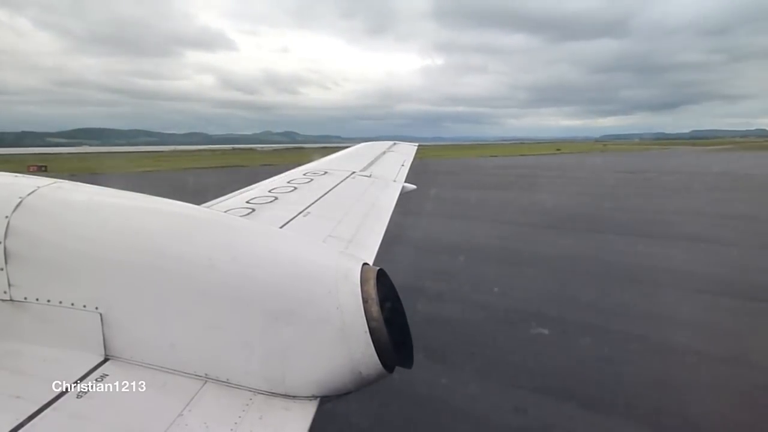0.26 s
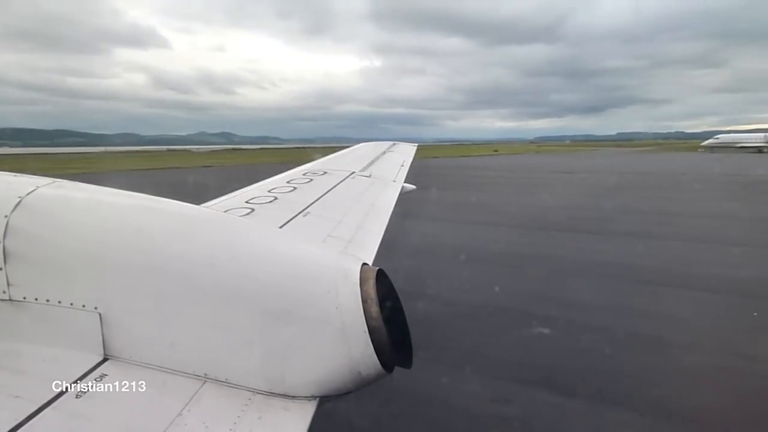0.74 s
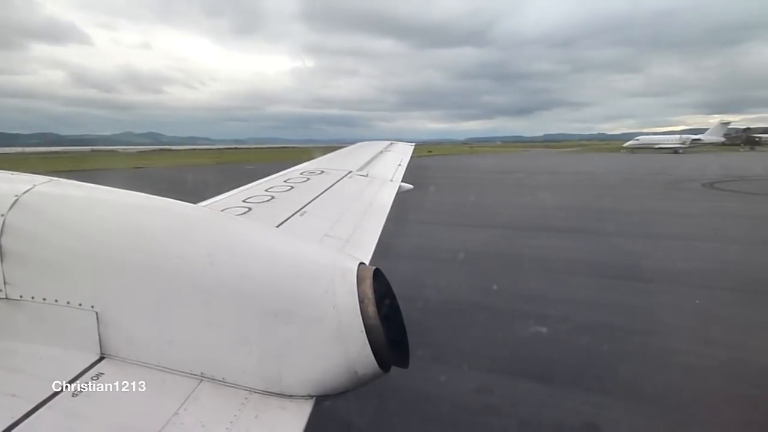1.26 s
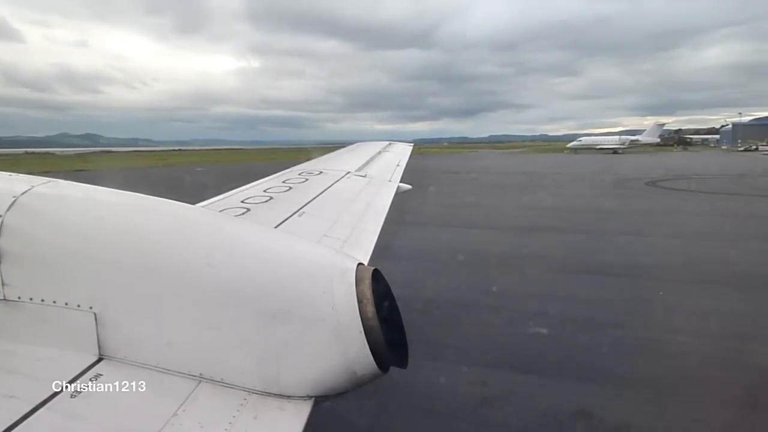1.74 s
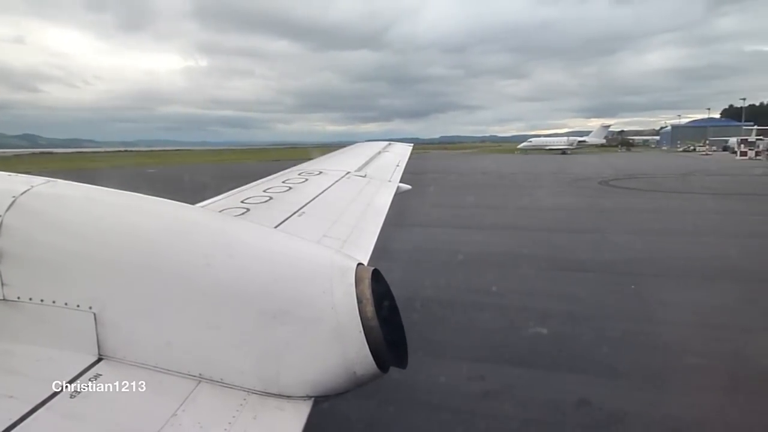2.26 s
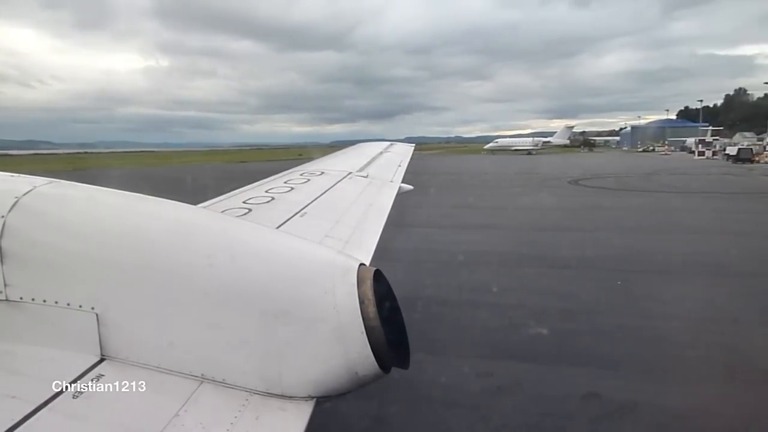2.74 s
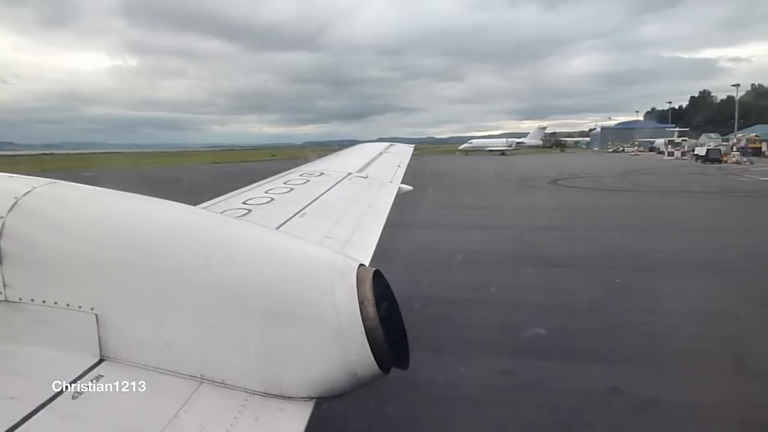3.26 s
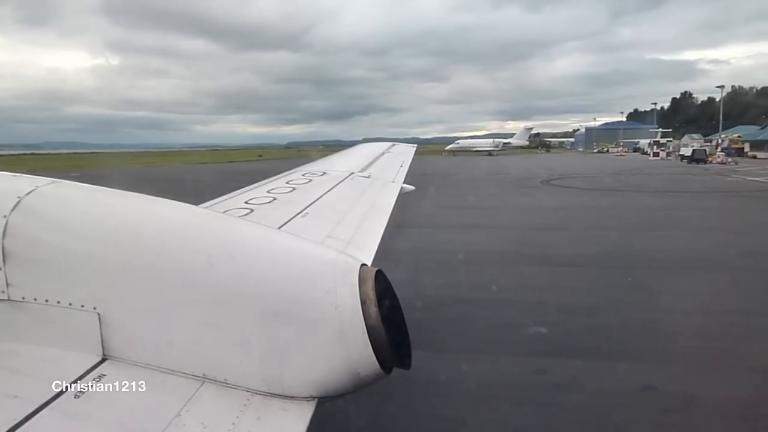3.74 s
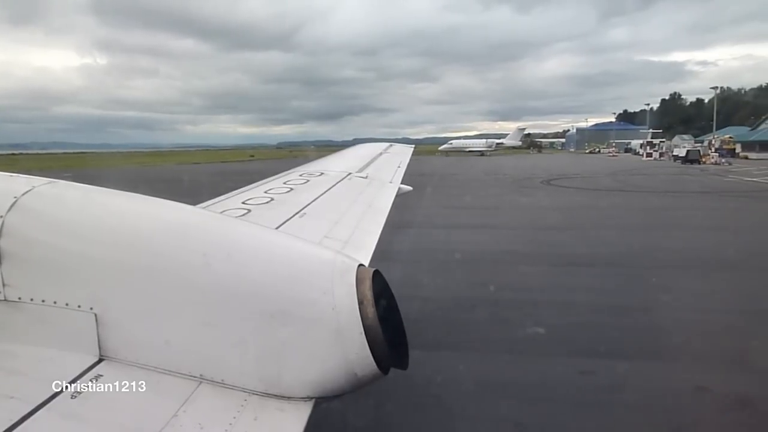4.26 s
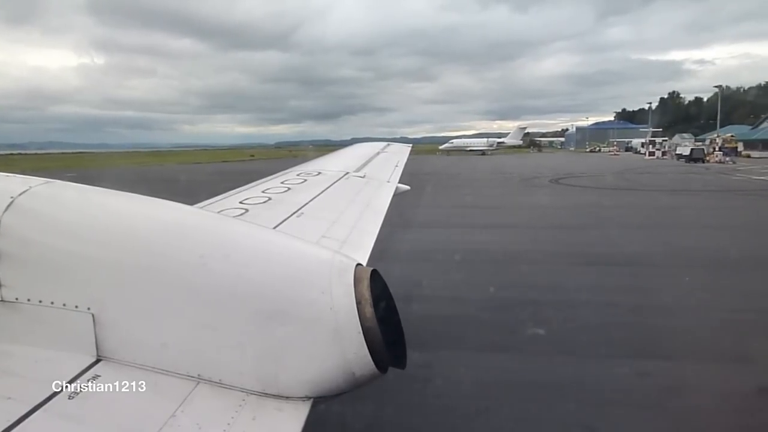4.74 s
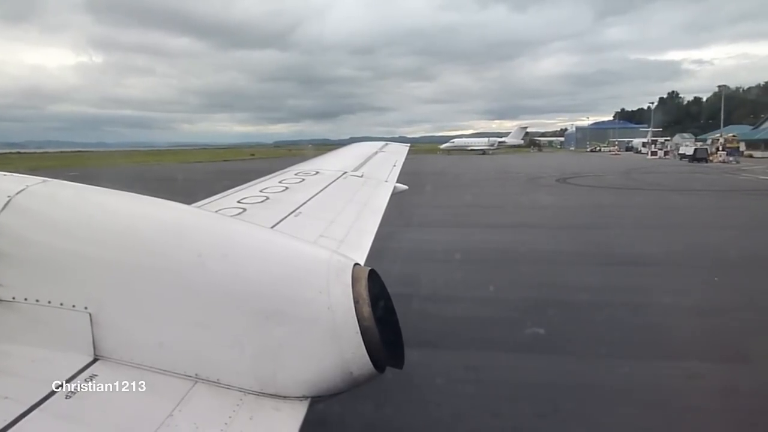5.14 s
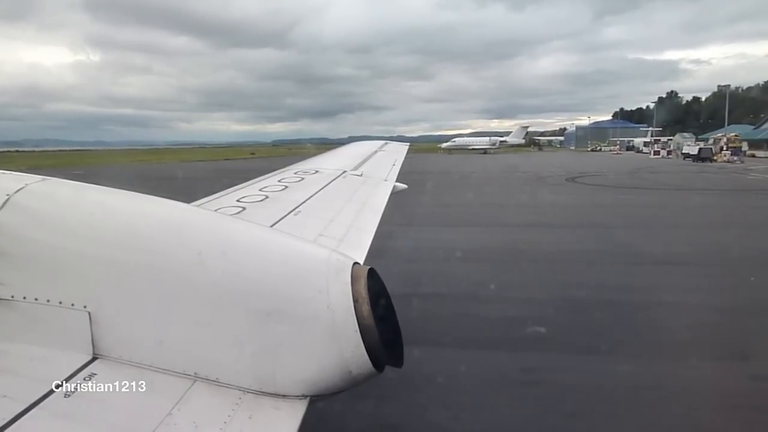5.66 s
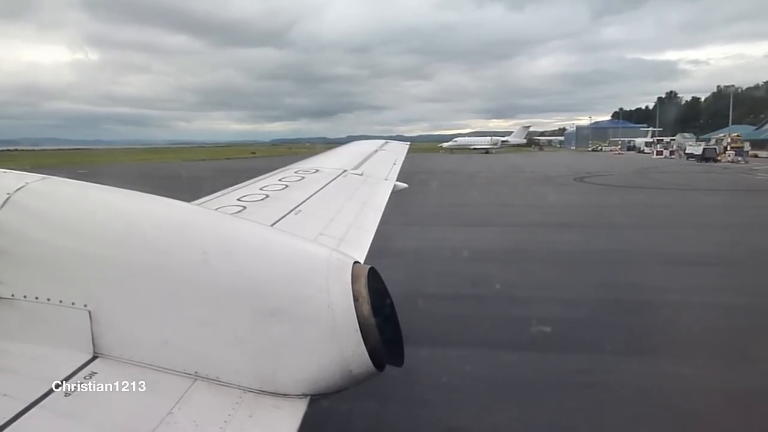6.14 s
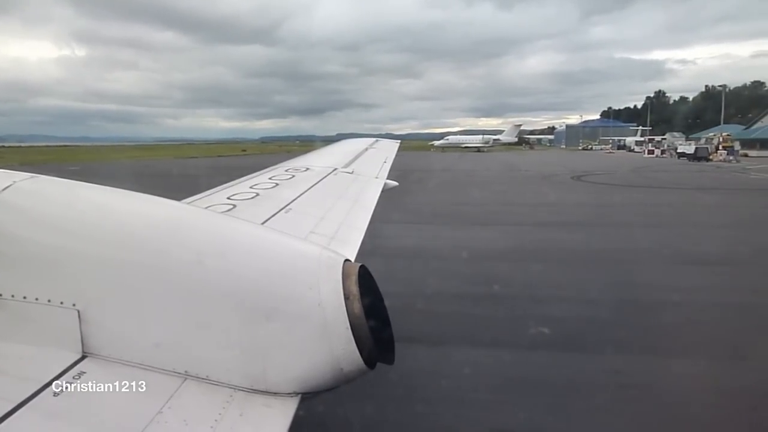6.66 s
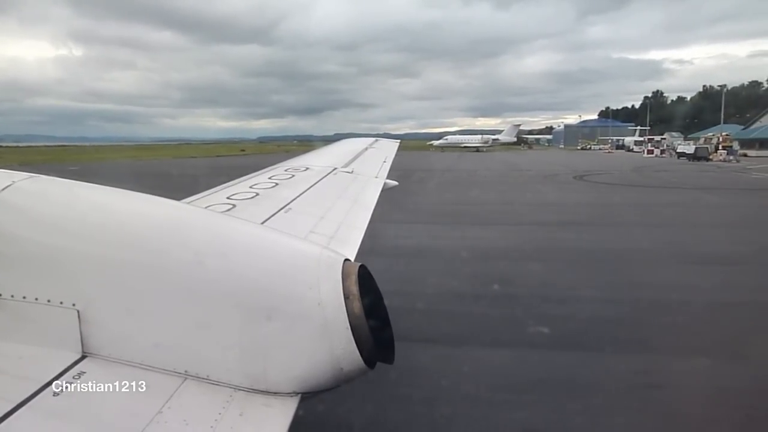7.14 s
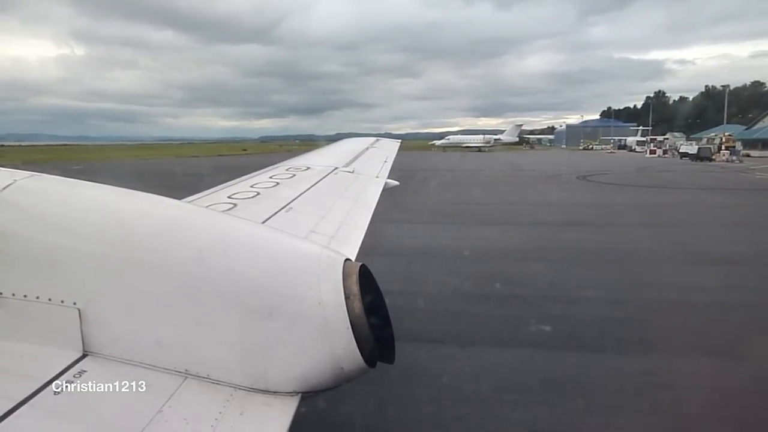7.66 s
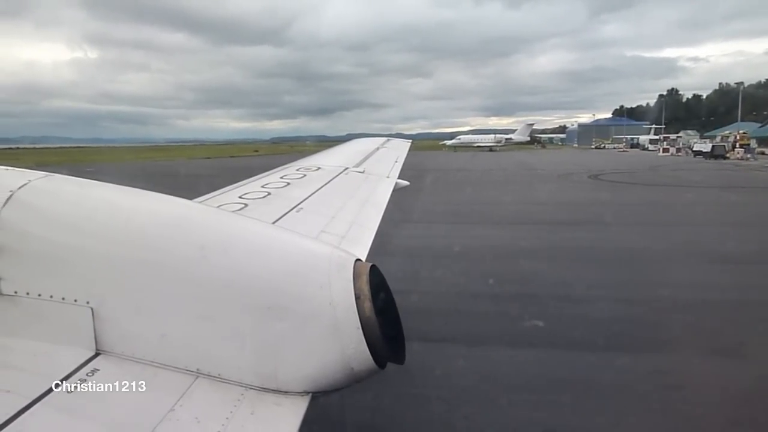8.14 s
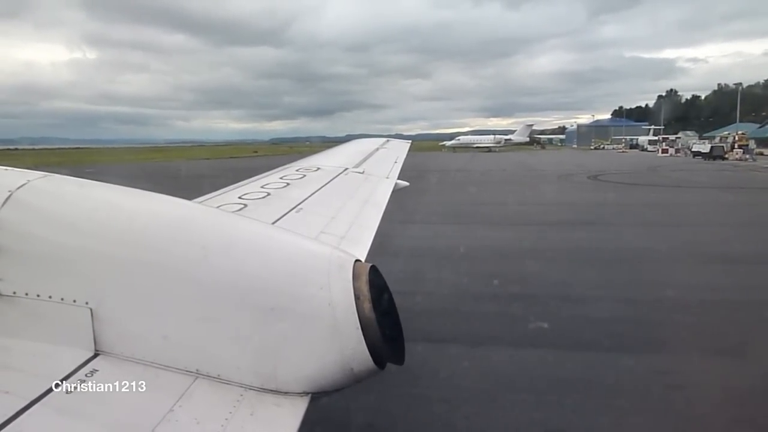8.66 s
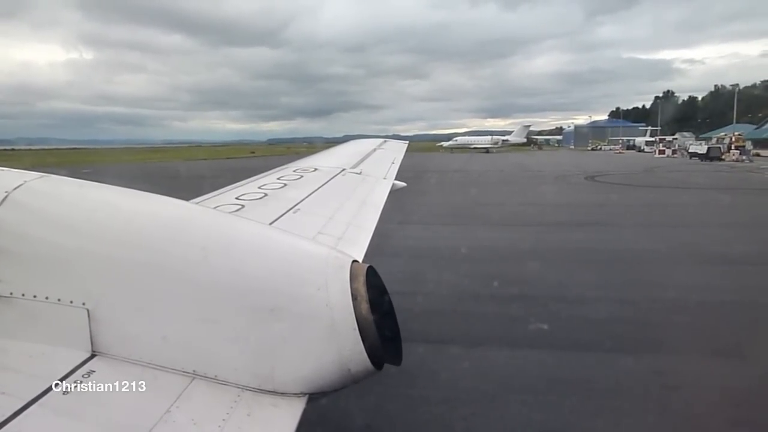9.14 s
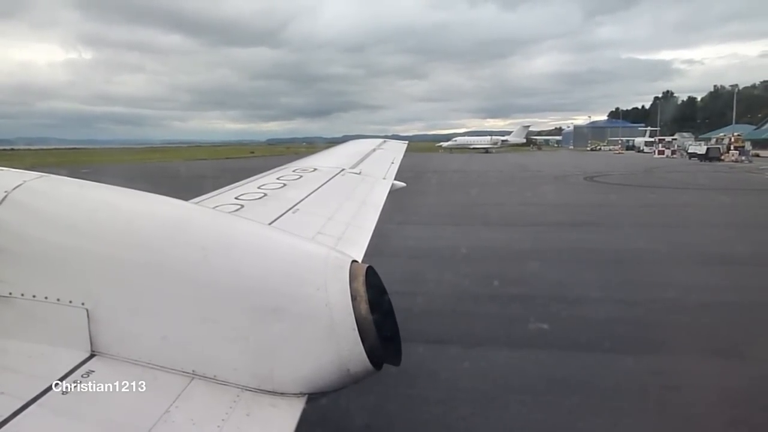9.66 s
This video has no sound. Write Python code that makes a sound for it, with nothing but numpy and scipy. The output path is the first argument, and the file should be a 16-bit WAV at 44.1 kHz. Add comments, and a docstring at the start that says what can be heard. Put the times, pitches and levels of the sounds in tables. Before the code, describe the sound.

A twin turboprop aircraft taxis at idle, heard from a window seat inside the cabin. The propellers make an even, low drone with a muffled exhaust roar, and a constant high whine stands out above it. Air vents hiss softly while the wheels rumble faintly on asphalt. Near the end, the cabin trim gives a couple of tiny ticks as the engines carry on unchanged.

```python
"""Turboprop cabin while taxiing

A twin turboprop taxis at ground idle, heard from two close microphone ports at a cabin window.
The four-blade propellers chop turbulent air into noisy humps near multiples of the blade rate.
Blade tones, shaft tones and a gear whine stand out of the exhaust roar and the hiss of the air vents.
The wheels rumble on asphalt, the vents whistle faintly, and late on the trim gives a few small ticks."""
import sys
import numpy as np
from scipy import signal
from scipy.fft import rfft, irfft, next_fast_len
from scipy.io import wavfile

SR = 44100
rng = np.random.default_rng(int(sys.argv[2]) if len(sys.argv) > 2 else 0)


def materialize(psi):
    """Save the field psi as 16-bit PCM at rate SR to the path in sys.argv[1].

    A 1-D psi becomes a single channel; in a 2-D psi each row is a channel.
    """
    bounded = np.clip(np.atleast_2d(psi).T, -1, 1)
    quanta = np.round(bounded * 32767).astype(np.int16)
    wavfile.write(sys.argv[1], SR, quanta)


N = 437031
FFT_SIZE = next_fast_len(N)
HZ = np.maximum(np.arange(FFT_SIZE // 2 + 1) * SR / FFT_SIZE, 1)

# Coherence of the ports. Each row: frequency in Hz, share of the power common to both.
COHERENCE = [(25, .98), (60, 1), (300, 0.99), (700, 0.92), (1300, 0.89), (2100, 0.66), (3500, 0.21),
             (5000, 0.82), (7000, 0.24), (10000, 0.12), (12000, 0.52), (14000, 0.17)]
# Balance of the ports. Each row: frequency in Hz, left minus right in dB.
BALANCE = [(60, 1.5), (150, 0.5), (380, 0.5), (950, 1.5), (2380, 1.5), (5980, 0), (15000, 0.5)]
# Propeller drone. Each row: time in seconds, level in dB.
DRONE_LEVEL = [(0, -21), (1.3, -19), (1.9, -20), (2.8, -19.5), (3.6, -20.5), (5.1, -19.5), (5.9, -21),
               (6.5, -21.5), (7.4, -21.5), (8.0, -22), (8.6, -21.5), (9.9, -22.5)]
# Turbulence cut by the blades. Each row: centre in Hz, width in Hz, relative level in dB.
BLADE_HUMPS = [(63.5, 20, -23), (134.5, 17.6, -1), (204.6, 27, 1.5), (268, 28, 0.5), (335, 25.5, 0.5),
               (400.6, 31, -3), (457.5, 53, -6.5)]
# Slow swells. Each row: time in seconds, gain in dB of humps 2, 3, 4, 5 and of the upper two together.
HUMP_GAINS = [(0, 4, -0.9, -0.24, 0.23, 0), (.7, 0, 0.71, 0.93, 0.38, 2.5), (1.4, -7, 1.8, 2, 1, -1),
              (2.0, 0.5, 0, -1.5, -0.19, -2), (2.6, 0.5, -0.67, 0.21, -0.24, 1),
              (3.3, 2.5, 0.083, 1.5, 1, -1.5), (4.0, -1, -0.053, 1.8, -0.11, 2.5),
              (4.7, 0.5, -0.21, 2, 0.5, 0), (5.2, -0.5, 1, 0, 0.16, 1), (5.7, 2.5, -2, 0.13, -0.36, -2),
              (6.4, 1, -1.3, -0.72, -1.3, 0), (7.2, -0.5, 1.3, 0, 1, 1), (7.9, 0.5, 1, 0, -0.021, -2.5),
              (8.5, -1.5, 1.5, 0, -0.1, 2.5), (9.15, 1, 0, 0, 1, 1), (9.9, 3.5, -0.25, 0, 0, -1.5)]
# Noise spectra. Each row: frequency in Hz, relative spectral density in dB.
RUMBLE_SPECTRUM = [(30, -50), (50, -26), (64, -6), (100, -5), (170, -1.5), (250, -1), (295, -2), (330, 2.5),
                   (366, -10), (400, -1.5), (450, -0.5), (525, -5.5), (550, -3), (620, -4), (700, -8.5),
                   (735, -6), (900, -13.5), (1300, -44.5)]    # between the humps
ROAR_SPECTRUM = [(500, -2), (850, -3), (1040, -5.5), (1500, -6.5), (1930, -16), (2230, -17), (2420, -44),
                 (2600, -60.5), (3380, -47), (5720, -120)]    # exhaust through the wall
HISS_SPECTRUM = [(1410, -7), (2400, -1), (3470, -3), (3830, -1), (4470, -4), (5660, -2), (6550, -6),
                 (9470, -11), (10800, -6), (15000, -4)]    # vents and intake
HISS_EDGE = [(15300, -12), (15750, -15)]    # top of the hiss
WHEEL_SPECTRUM = [(10, -16), (25, -9), (45, 3), (60, -1), (90, -39)]    # tyres on asphalt
# Engine noise, given as that of its hiss. Each row: time in seconds, level in dB.
ENGINE_LEVEL = [(0, -46), (.4, -45.8), (1.13, -47.5), (1.8, -47.5), (2.85, -47), (3.65, -48), (4.25, -44.5),
                (4.9, -45.5), (5.44, -46.5), (5.65, -49), (5.79, -46), (5.93, -49), (6.1, -48), (6.8, -48),
                (7.1, -46), (7.4, -49), (8.4, -48.5), (9.07, -47), (9.5, -49), (9.9, -47.5)]
# Rolling noise. Each row: time in seconds, level in dB.
WHEEL_LEVEL = [(0, -56), (1.2, -55), (2.7, -55), (3.6, -54), (4.8, -58), (6.0, -51), (7.5, -53), (8.3, -50),
               (9.9, -49)]
# Gear whine. Each row: time in seconds, pitch in Hz, level in dB.
GEAR_TONE = [(0.0, 766.5, -34.6), (1.2, 767.2, -35.6), (1.8, 764.5, -35.4), (2.4, 762.4, -35.2),
             (3.0, 760.7, -38.6), (3.6, 760.4, -39), (4.0, 761.1, -34), (4.8, 762.7, -34),
             (5.4, 762.3, -33.5), (5.8, 762.0, -37), (6.9, 759.5, -36.6), (7.6, 758.7, -38.2),
             (8.3, 759.0, -37.2), (9.9, 758.4, -37.2)]
# Its third harmonic. Each row: time in seconds, level in dB.
GEAR_THIRD = [(0, -62), (1.3, -68), (2.6, -62), (4.9, -58), (6.1, -63), (6.8, -68), (8.2, -62), (9.9, -64)]
# Blade tones, a list for each propeller. Each row: time in seconds, pitch in Hz, level in dB.
BLADE_TONES = [
    [(0, 70.6, -34), (1.2, 70.5, -37), (1.8, 71.4, -32.5), (2.5, 70.2, -38), (3.3, 70.5, -33),
     (4.2, 70.1, -42), (4.8, 70.4, -38), (6.2, 69.9, -32.5), (9.9, 70.26, -39)],
    [(0, 68.5, -42), (2.3, 68.2, -45), (3.2, 66.3, -48), (4.2, 67.4, -46), (6.2, 67.1, -40.5),
     (9.9, 66.4, -36.5)],
]
# Their harmonics. Each row: multiple of the pitch, level in dB against the tone's mean.
BLADE_HARMONICS = [(2, -6), (3, -3.5), (4, -4), (5, -4), (6, -8.5)]
# Faint tones of the shafts and a turbine stage. Each row: centre in Hz, width in Hz, mean level in dB.
SHAFT_BANDS = [(35, 1.5, -64), (83, 2, -46.5), (746, 7.6, -52)]
TURBINE_BANDS = [(10481, 25, -74)]
# Vent whistles. Each row: centre in Hz, width in Hz.
WHISTLE_BANDS = [(3800, 110), (5000, 160), (5800, 200)]
# Their rise and fall. Each row: time in seconds, level in dB of each whistle.
WHISTLE_LEVELS = [(0, -69, -72, -76), (.8, -68, -70, -76), (1.5, -70, -72, -76), (2.5, -72, -72, -74),
                  (3.3, -67, -63, -73), (4.4, -62, -63, -72), (5.2, -66, -74, -74), (6.0, -76, -74, -75),
                  (6.9, -66, -72, -78), (7.999, -63, -72, -78), (9.0, -68, -69, -74), (9.9, -73, -72, -83)]
# Contacts in the trim. Each row: start in seconds, ring peak in dB, ring pitch in Hz,
# time to fall 60 dB in seconds, crack against ring in dB, left minus right in dB.
TRIM_CONTACTS = [(7.5722, -38, 2700, .005, -6, 4), (7.5738, -44, 10300, .006, -5, 1),
                 (7.5762, -39, 5400, .012, -5, 1), (7.5765, -42, 6900, .014, -8, 1),
                 (7.592, -44, 7300, .012, -5, 1), (8.5455, -24.5, 9600, 0.0041, -8, -4),
                 (8.5585, -42, 13500, .006, -4, -4)]


def amp(db):
    """Amplitude ratio of a level in dB."""
    return 10 ** (np.asarray(db) / 20)


def unit_rms(x):
    """The signal scaled to rms 1."""
    return x / np.sqrt(np.mean(np.abs(x) ** 2) + 1e-20)


def in_time(rows):
    """Columns of a table as curves, one value a sample."""
    seconds, *columns = np.transpose(rows)
    return [np.interp(np.arange(N) / SR, seconds, column) for column in columns]


def in_frequency(rows):
    """A table interpolated at every bin on a logarithmic frequency axis."""
    hz, value = np.transpose(rows)
    return np.interp(np.log(HZ), np.log(np.maximum(hz, 1)), value)


def drift(corner_hz):
    """Slow random fluctuation of spread 1: noise through a two-pole low-pass."""
    step, settle = 40, 2000
    pole = np.exp(-2 * np.pi * step * corner_hz / SR)
    white = rng.standard_normal(N // step + settle + 2)
    slow = signal.lfilter([1], [1, -2 * pole, pole * pole], white)[settle:]
    return np.interp(np.arange(N) / step, np.arange(len(slow)), unit_rms(slow - slow.mean()))


def phase_of(hz):
    """Phase is the time integral of frequency."""
    return 2 * np.pi * np.cumsum(hz) / SR


def sine(phase, db):
    """A sinusoid of this rms level."""
    return np.sqrt(2) * amp(db) * np.sin(phase)


def band(hz, width_hz):
    """Magnitude of a flat-topped band whose power does not depend on its width."""
    return 1 / np.sqrt(1 + (2 * (HZ - hz) / width_hz) ** 4) / np.sqrt(width_hz)


def waveform(spectra):
    """Inverse Fourier transform for both ports."""
    return irfft(spectra, FFT_SIZE)[:, :N]


def at_ports(common, own=(0, 0), lag_s=.00003):
    """Time and level differences: the common part arrives later on the right; balance varies with pitch."""
    delay = np.exp(-2j * np.pi * HZ * lag_s)
    lean = amp(in_frequency(BALANCE) / 2)
    return np.array([(common + own[0]) * lean, (common * delay + own[1]) / lean])


def noise_spectra(magnitude):
    """Partial coherence: each port receives a common noise plus one of its own."""
    white = rng.standard_normal((3, len(HZ))) + 1j * rng.standard_normal((3, len(HZ)))
    share = np.clip(in_frequency(COHERENCE), 0, 1)
    return magnitude * at_ports(white[0] * np.sqrt(share), white[1:] * np.sqrt(1 - share))


def noise(magnitude):
    """Partly coherent noise of this spectral shape, rms 1."""
    return unit_rms(waveform(noise_spectra(magnitude)))


def gusty_noise(spectrum, gust, gust_db, flicker_db):
    """Amplitude modulation: half-octave bands follow the gusts together and flicker separately."""
    spectra, out = noise_spectra(amp(in_frequency(spectrum))), 0
    low_hz, high_hz = spectrum[0][0], spectrum[-1][0]
    for centre in np.arange(np.log2(low_hz), np.log2(high_hz) + .5, .5):
        window = np.cos(np.pi * np.clip(np.log2(HZ) - centre, -.5, .5)) ** 2    # neighbours cross-fade
        out += waveform(spectra * window) * amp(gust_db * gust + flicker_db * drift(16))
    return unit_rms(out)


def propeller_drone(gust):
    """Spectral broadening: eddies last a few blade passes, so each harmonic smears into a noise band."""
    surge_db = 0.22 * gust + 0.49 * drift(5.9)
    *lower, upper = in_time(HUMP_GAINS)
    humps = 0
    for (hz, width_hz, db), swell_db in zip(BLADE_HUMPS, [0, *lower, upper, upper]):
        humps += amp(db + swell_db + 0.47 * drift(0.94)) * noise(band(hz, width_hz))
    rumble = amp(-7) * noise(amp(in_frequency(RUMBLE_SPECTRUM)))
    return amp(in_time(DRONE_LEVEL)[0] + surge_db) * (unit_rms(humps) + rumble)


def exhaust_roar(gust, swing_db):
    """Transmission loss: exhaust noise comes through the wall with little treble."""
    return amp(-37.5 + 0.96 * swing_db) * gusty_noise(ROAR_SPECTRUM, gust, gust_db=0.8, flicker_db=0.5)


def vent_hiss(gust, engine_db, shaft_phase):
    """Broadband flow noise of vents and intake, amplitude-modulated at the accessory shaft's rate."""
    throb_db = .45 * np.sin(shaft_phase)
    flow = gusty_noise(HISS_SPECTRUM + HISS_EDGE, gust, gust_db=0.65, flicker_db=1.0)
    return amp(engine_db + throb_db) * flow


def wheel_roll():
    """Roughness excitation: uneven asphalt drives a low, swelling rumble from the wheels."""
    level_db = in_time(WHEEL_LEVEL)[0] - 2 * drift(.7)
    return amp(level_db) * noise(amp(in_frequency(WHEEL_SPECTRUM)))


def gear_whine():
    """Periodic tooth meshing gives a tone with odd harmonics, each wavering in level on its own."""
    hz, db = in_time(GEAR_TONE)
    phase = phase_of(hz)
    third = sine(3 * phase, in_time(GEAR_THIRD)[0] + drift(3))
    fifth = sine(5 * phase, -77 + 2 * drift(2))
    return sine(phase, db + 0.8 * drift(3.4)) + third + fifth


def blade_tones(wander_hz=0.73, waver_db=3, harmonic_waver_db=3.5):
    """Beating: the two propellers' tones lie a few hertz apart, each unsettled by uneven inflow."""
    out = 0
    for hz, db in map(in_time, BLADE_TONES):
        phase = phase_of(hz + wander_hz * drift(3.84))
        out += sine(phase, db + waver_db * drift(4.1))
        for multiple, relative_db in BLADE_HARMONICS:
            out += sine(round(multiple) * phase, db.mean() + relative_db + harmonic_waver_db * drift(2.5))
    return out


def shaft_hum(shaft_phase, swing_db):
    """Forced vibration: the accessory shaft hums at its rate, rising and falling with the engine noise."""
    return sine(shaft_phase, -35.5 + 0.86 * swing_db)


def rotor_tones(swing_db):
    """Narrow-band noise is heard as pitch: the faint tones of the shafts and a turbine stage."""
    bands = SHAFT_BANDS + TURBINE_BANDS
    power = sum(amp(2 * db) * band(hz, width_hz) ** 2 for hz, width_hz, db in bands)
    total_rms = np.sqrt(sum(amp(2 * db) for _, _, db in bands))
    return total_rms * amp(swing_db) * noise(np.sqrt(power))


def vent_whistles():
    """Flow tones: air sings faintly in the vents, as narrow bands of noise that swell and fade."""
    return sum(amp(db) * noise(band(hz, width_hz))
               for (hz, width_hz), db in zip(WHISTLE_BANDS, in_time(WHISTLE_LEVELS)))


def trim_ticks(attack_s=0.00035, crack_t60_s=.007):
    """Impact excitation: small hard plastic parts touch, giving a bright crack and a damped ring."""
    out, t = np.zeros((2, N)), np.arange(SR // 50) / SR
    cracks = np.diff(rng.standard_normal((len(TRIM_CONTACTS), 2, len(t) + 1)))
    for (start_s, db, hz, t60_s, crack_db, pan_db), crack in zip(TRIM_CONTACTS, cracks):
        ring = np.sin(2 * np.pi * hz * t) * amp(-60 * t / t60_s) * np.minimum(t / attack_s, 1)
        tick = ring / ring.max() + amp(crack_db - 60 * t / crack_t60_s) * crack
        at = round(start_s * SR)
        out[:, at:at + len(t)] += tick * amp([[db + pan_db / 2], [db - pan_db / 2]])
    return out


def scene():
    """Superposition: all sources add at the two ports; drone, roar and hiss share the same gusts."""
    engine_db, = in_time(ENGINE_LEVEL)
    swing_db = engine_db - engine_db.mean()
    gust = unit_rms(drift(12.6) + 0.25 * drift(60))
    drone = propeller_drone(gust)
    roar = exhaust_roar(gust, swing_db)
    shaft_phase = phase_of(103.3 + 0.14 * drift(0.41))
    hiss = vent_hiss(gust, engine_db, shaft_phase)
    roll = wheel_roll()
    tones = gear_whine() + blade_tones() + shaft_hum(shaft_phase, swing_db)
    coherent_tones = waveform(at_ports(rfft(tones, FFT_SIZE)))
    return drone + roar + hiss + roll + coherent_tones + rotor_tones(swing_db) + vent_whistles() + trim_ticks()


def record(dry, cutoff_hz=15760):
    """Band limiting: a steep elliptic low-pass removes the highest treble."""
    return signal.sosfilt(signal.ellip(14, .5, 60, cutoff_hz, fs=SR, output="sos"), dry)


dry = scene()
out = record(dry)
materialize(out)
```